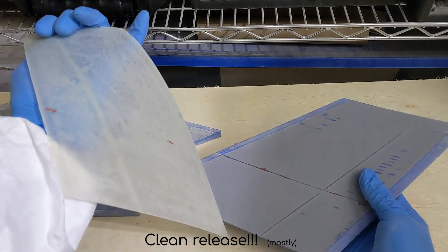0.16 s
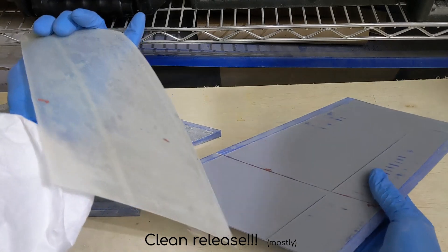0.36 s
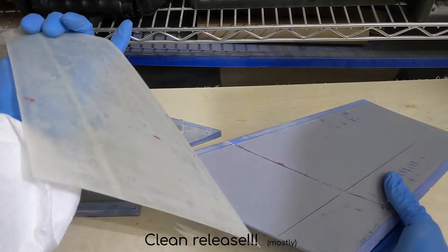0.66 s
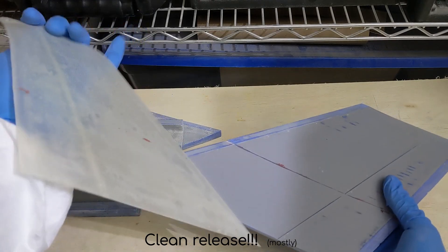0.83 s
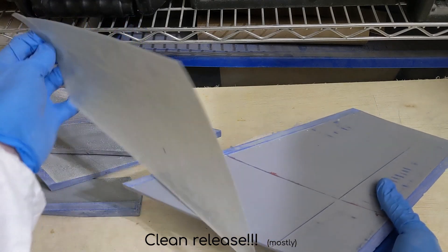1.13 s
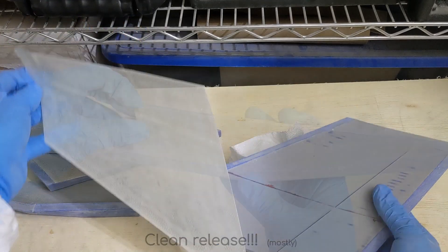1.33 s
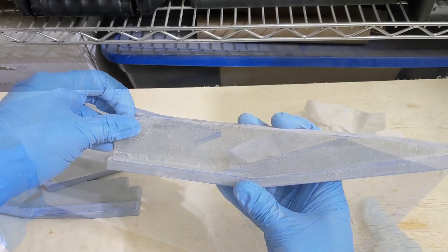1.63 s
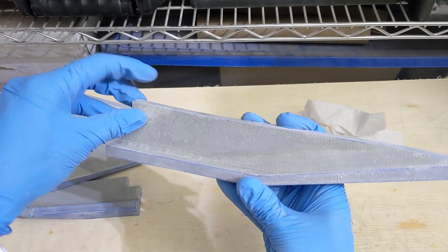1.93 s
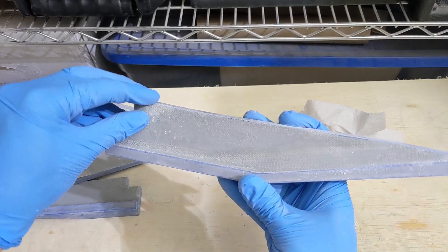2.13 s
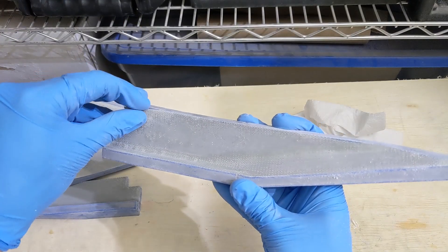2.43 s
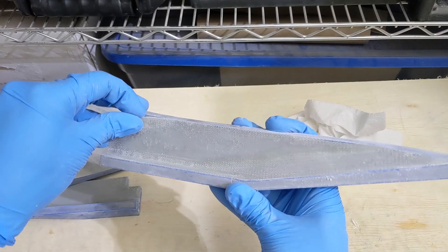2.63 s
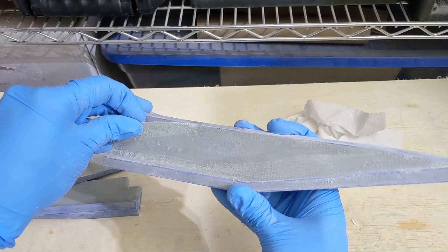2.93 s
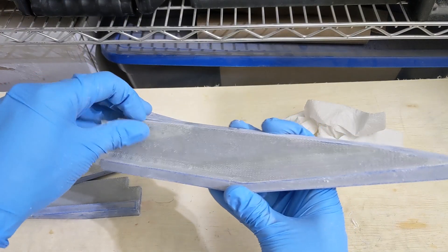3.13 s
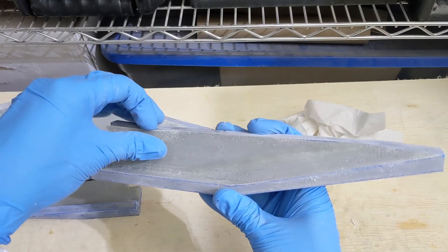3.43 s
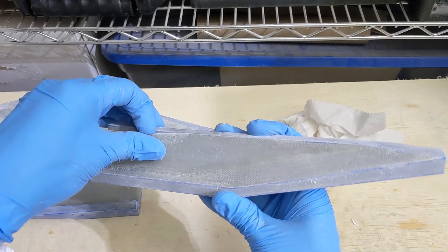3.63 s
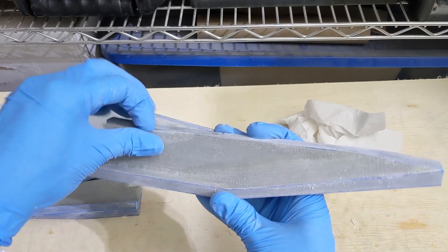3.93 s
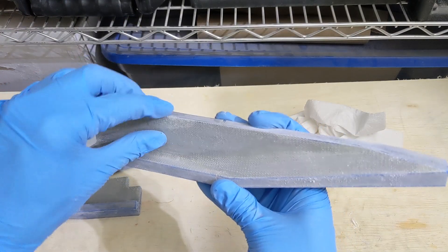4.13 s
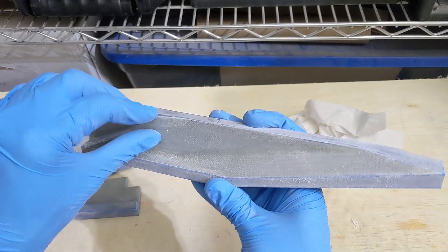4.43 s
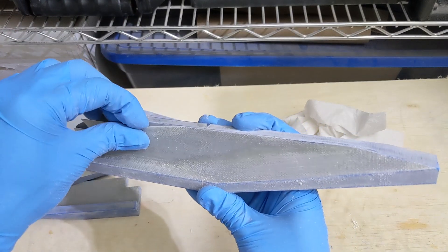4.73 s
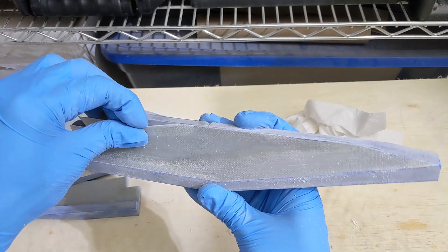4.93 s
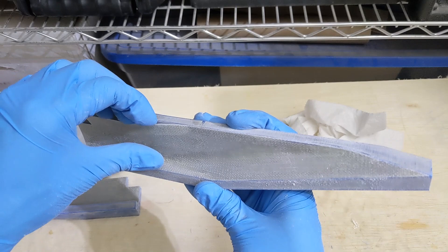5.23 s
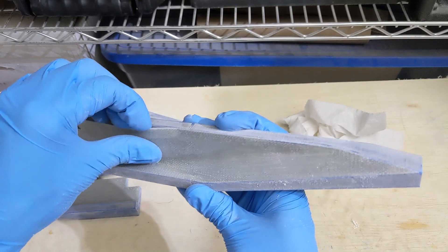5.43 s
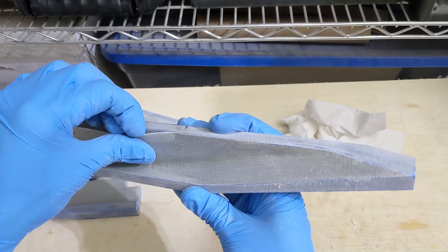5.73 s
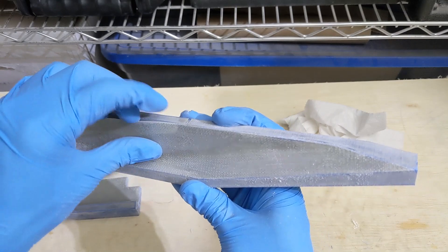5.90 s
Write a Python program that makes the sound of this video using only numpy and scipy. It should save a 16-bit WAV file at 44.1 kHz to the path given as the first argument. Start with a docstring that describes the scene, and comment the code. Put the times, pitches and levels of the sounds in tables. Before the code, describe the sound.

A stiff sheet scrapes and is tapped quietly, then a loud brittle crack with a low thump and two more snaps ring in a small workshop.

```python
"""A thin fiberglass skin is prised off its plastic mold at a workbench and lets go in three sharp snaps.
Each snap is shaped noise with mold resonances and a room tail; the first adds an air pulse and a low thump.
A loose skin scrapes as resonant friction, rubber gloves slide as grainy noise, and resin ticks
and fingers tap as small pitched cracks. The small workshop rings briefly; a ventilation fan hums low,
made of coloured noise and wavering tones."""
import sys
import numpy as np
from scipy import signal
from scipy.fft import rfft, irfft, next_fast_len
from scipy.io import wavfile
from scipy.ndimage import uniform_filter1d

SR = 44100
rng = np.random.default_rng(int(sys.argv[2]) if len(sys.argv) > 2 else 0)


def waveform_to_disk(signal):
    """Save audio, clipped to [-1, 1], as 16-bit WAV at the path in sys.argv[1]."""
    frames = np.transpose(np.atleast_2d(signal))
    scaled = np.clip(frames, -1, 1) * 32767
    samples = np.round(scaled).astype(np.int16)
    wavfile.write(sys.argv[1], SR, samples)


N = 267246
TIME = np.arange(N) / SR
# the background changes between these times; the gloves rub a stiffer body after the second
CHANGE_START_S, CHANGE_END_S = 1.476, 1.58
# the bond lets go: (t/s, direct and room level/dB before the mold rings, crack t60/s,
# room level/dB against the direct crack, room t60/s before the band shares, direct left-right/dB)
SNAPS = [(2.9381, -14, 0.015, -11.5, 0.32, 4.5), (4.8497, -26, 0.012, -10, 0.19, -13.5),
         (5.6378, -14.5, 0.0077, -12.5, 0.35, 9.5)]


def snaps():
    """The skin jumps off the mold; the direct crack leans to one side, the room is even."""
    # colour of each snap: (f/Hz, level/dB)
    snap_colours = [
        [(200, -13), (850, -9.5), (1300, -3), (1900, -6), (2900, -0.5), (3900, 0.5), (4900, -4.5), (6200, -3),
         (7400, -1), (8500, -3.5), (11500, -3.5), (14500, -0.5), (16000, -4.5)],
        [(200, -40), (1200, -33.5), (1600, -29), (2100, -8), (2900, -10.5), (3400, -13), (4100, -4),
         (5000, -9.5), (6300, -12.5), (9000, -14), (13000, -14), (16000, -26)],
        [(200, -42), (900, -18.5), (1400, -15.5), (2000, -11), (2800, -5), (3800, -2), (4800, -0.5), (6200, 2),
         (8000, 1.5), (9500, -2), (11500, -3), (13500, -6), (16000, -5.5)],
    ]
    # narrow resonances of the skin on its mold, rung by every snap: (f/Hz, width/Hz, level/dB)
    mold_modes = [(1350, 330, -4.5), (2920, 120, -3.5), (4050, 100, -6), (6103, 99, 4), (7000, 190, 0.5),
                  (14000, 130, -1), (15300, 93, -7), (14800, 69, 3)]
    out = np.zeros((2, N))
    for (s, db, t60, room_db, room_t60, pan_db), spectrum in zip(SNAPS, snap_colours):
        x = crack(spectrum, db, t60, room_db, room_t60, pan_db, edge_db=-12.5, ring_db=-4.5, ring_t60=0.12)
        ringing = sum(resonate(x, [mode]) for mode in mold_modes)
        add(out, s, x + ringing)
    return out


def puff_and_low_pulse(last_db=-17, last_width_s=0.00017, rumble_cut_hz=40):
    """The first snap shoves air out, mostly at right; a small low pulse sounds with the last, more at left."""
    puff_s, puff_db, puff_width_s = 2.9391, -5.5, 0.00046
    thump_hz, thump_t60_s, thump_db, onset_s = 59.2, 0.056, -6, 0.00066
    puff = from_db(puff_db) * np.exp(-((TIME - puff_s) / puff_width_s) ** 2)
    t = np.maximum(TIME - puff_s, 0)
    swing = -np.cos(2 * np.pi * thump_hz * t) * (1 - np.exp(-t / onset_s))
    thump = from_db(thump_db) * swing * np.exp(-np.log(1000) * t / thump_t60_s)
    last_snap_s = SNAPS[-1][0]
    low_pulse = from_db(last_db) * np.exp(-((TIME - last_snap_s) / last_width_s) ** 2)
    channels = (puff + thump) * from_db([[-24], [0]]) + low_pulse * from_db([[0], [-8]])
    high_pass = signal.butter(4, rumble_cut_hz, "high", fs=SR, output="sos")
    return signal.sosfilt(high_pass, channels + 1e-18)


def fractures():
    """Swelling runs of tiny fractures around the snaps; the first and last run on past the snap."""
    # runs of fractures: (start t/s, end t/s, level/dB at the start, level/dB at the end), before the side lean
    runs = [(2.915, 2.944, -76, -58), (4.809, 4.849, -53, -44.5), (5.588, 5.667, -64, -61)]
    # colour of the fractures: (f/Hz, level/dB)
    fracture_colour = [(500, -21), (1500, -17.5), (2700, -2.5), (5500, -2), (9000, -3.5), (16000, -8.5)]
    level = np.zeros(N)
    for start, end, start_db, end_db in runs:
        swell = from_db(np.interp(TIME, [start, end], [start_db, end_db]))
        level += swell * (TIME >= start) * (TIME < end)
    grains = friction(per_s=1500, grain_db=4.5, smooth_db=-14.0)
    return level * rms_one(colour(grains, fracture_colour)) * from_db([[-1], [1]])


def ticks():
    """The resin ticks as the skin is flexed: clear cracks, and faint ones at random while it is prised."""
    # small cracks of the resin: (t/s, level/dB, centre f/Hz, spread/octaves)
    clear = [(0.243, -57.5, 2030, 0.12), (0.9027, -50.5, 6530, 0.16), (1.11, -62.5, 4360, 0.067),
             (1.7889, -57.5, 3630, 0.46), (2.262, -56, 7550, 0.31), (2.485, -59, 6100, 0.6),
             (2.8312, -60, 3320, 1.2), (3.6774, -61, 3900, 0.6), (3.708, -56.5, 4420, 0.39),
             (3.8494, -59, 4180, 0.16), (3.895, -58, 2780, 0.11), (4.0829, -48.5, 6760, .45),
             (4.797, -51.5, 10500, 0.3), (4.814, -51.5, 11500, .4), (4.826, -43, 3760, 0.45),
             (4.831, -42.5, 5500, 0.77), (5.605, -45.5, 5800, 0.42), (5.8272, -54.5, 11130, 0.16),
             (5.837, -52.5, 7000, 1.1), (5.9287, -50, 6700, .45)]
    prising_start, prising_end = 3.4, TIME[-1]
    faint_per_s, faint_db, faint_hz, faint_octaves = 2.0, -68.5, 6050, 0.8
    prising = prising_end - prising_start
    faint = []
    for when, pitch in rng.random((int(faint_per_s * prising), 2)):
        # pitches fall within half an octave either way
        faint.append((prising_start + when * prising, faint_db, faint_hz * 2 ** (pitch - 0.5), faint_octaves))
    out = np.zeros((2, N))
    for s, db, hz, spread in clear + faint:
        add(out, s, small_hit(db, hz, spread, t60=0.016, ring_t60=0.062, room_db=-6.0, room_t60=0.17,
                              pan_db=-8.5, edge_db=-1.5, treble_db=-20))
    return out


def scrape():
    """The edge of the loose skin sticks and slips, ringing the whole sheet."""
    # the loose skin is pushed over the mold: (peak t/s, slide/s, level/dB)
    scrapes = [(0.0, 0.16, -47.5), (0.465, 0.053, -48)]
    # resonances of the loose skin: (f/Hz, width/Hz, level/dB)
    skin = [(403, 62, -10), (780, 47, -2.5), (1410, 210, -7), (1930, 510, -8.5), (2690, 180, 2.5),
            (3000, 200, 1.5), (3400, 1400, -13)]
    # the sheet radiates less treble: (f/Hz, level/dB)
    scrape_top = [(3200, -5.5), (5500, -12), (9000, -9.5), (15000, -20)]
    # each push takes hold, loses force as it slides, then lifts off
    grip_db_per_s, sag_db_per_s, lift_db_per_s = 195, 111, 450
    force = np.zeros(N)
    for s, slide, db in scrapes:
        t = TIME - s
        grip = grip_db_per_s * np.minimum(t, 0)
        sag = sag_db_per_s * np.clip(t, 0, slide)
        lift = lift_db_per_s * np.clip(t - slide, 0, 1)
        force += from_db(db + grip - sag - lift)
    slips = friction(per_s=600, grain_db=1, smooth_db=5.5)
    return force * rms_one(colour(resonate(slips, skin), scrape_top))


def gloves():
    """Rubber slides over the loose skin, then the molded shell: grainy hiss over the rubbed body's own colour."""
    # glove strokes: (peak t/s, length/s, rubber hiss level/dB, rubbed body level/dB), before the side lean
    strokes = [(0.412, 0.027, -48, -48.5), (0.913, 0.036, -57.5, -51.5), (0.953, 0.033, -71, -53),
               (1.03, 0.083, -75.5, -71), (1.122, 0.033, -71.5, -60), (1.216, 0.064, -68, -61.5),
               (1.336, 0.12, -76.5, -70.5), (1.498, 0.018, -68.5, -66), (1.937, 0.036, -61, -71.5),
               (2.112, 0.075, -76, -73.5), (2.285, 0.041, -58.5, -56.5), (3.122, 0.037, -62, -80),
               (3.208, 0.06, -58, -73), (3.274, 0.096, -66.5, -82), (4.074, 0.12, -62, -66.5),
               (4.308, 0.064, -60.5, -66), (4.436, 0.033, -78.5, -72.5), (5.21, 0.064, -60, -72.5),
               (5.935, 0.049, -56.5, -60.5)]
    # colour of the rubber: (f/Hz, level/dB)
    rubber = [(300, -14.5), (1500, -29), (2300, -10), (3500, 3.5), (5500, 2), (8000, -1), (12000, -1),
              (13500, -14), (16000, -12.5)]
    # the loose skin when rubbed: (f/Hz, level/dB)
    sheet = [(150, -22), (320, -3), (550, -2.5), (1150, -3.5), (2300, 0), (3500, -4), (7500, -13),
             (10000, -23.5), (15000, -30.5)]
    # resonances of the shell held in the hand: (f/Hz, width/Hz, level/dB)
    shell = [(1263, 108, -0.5), (1954, 340, -2.5), (3160, 890, -6.5)]
    # between strokes the grip creeps a little all the time
    creep_hiss_db, creep_body_db, creep_swing_db, creep_per_s = -83.5, -83.5, 4, 6
    creep = from_db(creep_swing_db * drift(creep_per_s))
    hiss, body = from_db(creep_hiss_db) * creep, from_db(creep_body_db) * creep
    rise_share = 0.38  # part of a stroke spent speeding up
    for s, length, hiss_db, body_db in strokes:
        width = length * np.where(TIME < s, rise_share, 1 - rise_share)
        stroke = 1 / np.cosh(np.clip((TIME - s) / width * 1.16, -20, 20))
        hiss += from_db(hiss_db) * stroke
        body += from_db(body_db) * stroke
    slips = friction(per_s=1500, grain_db=3.5, smooth_db=-6)
    loose_skin = rms_one(colour(slips, sheet))
    molded_shell = rms_one(resonate(slips, shell))
    rubbed = np.where(TIME < CHANGE_END_S, loose_skin, molded_shell)
    return (hiss * rms_one(colour(slips, rubber)) + body * rubbed) * from_db([[-1], [1]])


def taps():
    """Fingers and edges knock dully on the thin laminate; a soft touch rings one narrow band."""
    # knocks: (t/s, level/dB, centre f/Hz, spread/octaves)
    knocks = [(0.027, -51.5, 3000, 0.16), (0.1185, -46.5, 1413, 0.12), (0.2264, -53.5, 510, 0.26),
              (0.227, -60, 1730, .18), (0.397, -44.5, 2220, 0.67), (0.417, -44.5, 2030, 0.24),
              (0.764, -63.5, 1500, 0.28), (0.919, -48.5, 1180, 0.28), (1.213, -53, 770, 0.68),
              (3.8956, -48.5, 1630, 0.54), (4.0824, -54, 1310, .13), (5.882, -58.5, 1360, 0.12)]
    out = np.zeros((2, N))
    for s, db, hz, spread in knocks:
        add(out, s, small_hit(db, hz, spread, t60=0.018, ring_t60=0.038, room_db=-7, room_t60=0.14,
                              pan_db=-2, edge_db=-6.5, treble_db=-49))
    return out


def small_hit(db, hz, spread, t60, ring_t60, room_db, room_t60, pan_db, edge_db, treble_db,
              bass_db=-54, dryness=0.28):
    """A small crack ringing round its own pitch over weaker treble and bass; the higher, the sooner it dies."""
    octaves = np.linspace(-6, 6, 241)
    floor_db = np.where(octaves < 0, bass_db, treble_db)
    bell_db = floor_db * octaves ** 2 / (octaves ** 2 + 11 * spread ** 2)
    spectrum = np.column_stack([hz * 2 ** octaves, bell_db])
    length = (3000 / hz) ** dryness  # both decay times hold as given at 3 kHz
    return crack(spectrum, db, t60 * length, room_db, room_t60, pan_db, edge_db,
                 ring_db=2.5, ring_t60=ring_t60 * length)


def crack(spectrum, db, t60, room_db, room_t60, pan_db, edge_db, ring_db, ring_t60):
    """Sharp edge, burst of resin, the shell's short ring and the room; db is the energy spread over 10 ms."""
    burst = dying_noise(t60)
    burst[:, 0] += from_db(edge_db)
    direct = even(burst) * from_db([[pan_db / 2], [-pan_db / 2]])
    direct = direct + from_db(ring_db) * dying_noise(ring_t60)
    direct = direct / np.sqrt(np.sum(direct ** 2) / 2)
    x = colour(direct + from_db(room_db) * room_tail(room_t60), spectrum)
    return from_db(db) * x / np.sqrt(np.sum(x ** 2) / 2 / (SR / 100))


def even(burst, smooth_hz=400):
    """Level out the chance humps in a burst's spectrum, so that a crack keeps its own colour."""
    size = burst.shape[1]
    bins = max(int(smooth_hz * size / SR), 1)
    power = uniform_filter1d(np.abs(rfft(burst)) ** 2, bins, axis=1)
    hz = np.fft.rfftfreq(size, 1 / SR) + 1
    sides = []
    for side, p in zip(burst, power):
        inverse_db = -10 * np.log10(p / p.mean())
        sides.append(colour(side, np.column_stack([hz, inverse_db])))
    return np.array(sides)


def dying_noise(t60):
    """Half a second of dense ringing, different in each channel, with unit energy per side."""
    t = TIME[:SR // 2]
    x = rng.standard_normal((2, len(t))) * np.exp(-np.log(1000) * t / t60)
    return x / np.sqrt(np.sum(x ** 2, axis=1, keepdims=True))


def friction(per_s, grain_db, smooth_db):
    """Tiny slips of uneven size, each blurred by the room, over a smooth hiss."""
    when = rng.random(N) < per_s / SR
    size = from_db(grain_db * np.minimum(rng.exponential(1, N), 4))
    slips = when * size * rng.choice([-1, 1], N)
    blur = dying_noise(0.0051) + from_db(-3.5) * dying_noise(0.33)
    grains = rms_one(signal.fftconvolve(slips[None], blur, axes=1)[:, :N])
    return grains + from_db(smooth_db) * rng.standard_normal((2, N))


def room_tail(t60):
    """Diffuse echoes of the workshop, each band dying at its own rate."""
    # decay by band: (f/Hz, share of the room's t60)
    room_decay = [(500, 0.77), (1300, 0.66), (3000, 1.15), (7000, 1.0), (11000, 0.92), (15000, .56)]
    size = SR // 2
    noise, out = rfft(rng.standard_normal((2, size))), 0
    centres, shares = np.transpose(room_decay)
    for weights, share in zip(np.eye(len(centres)), shares):
        band = irfft(noise * at_hz(np.column_stack([centres, weights]), size), size)
        out = out + band * np.exp(-np.log(1000) * TIME[:size] / (t60 * share))
    return out / np.sqrt(np.sum(out ** 2) / 2)


def workshop():
    """Fan tones and room air; one set cross-fades quickly into another with its own tones and colour."""
    # fan tones before and after: (f/Hz, level/dB before the tone trim)
    hum_early = [(64.6, -75), (113.0, -73), (177.6, -70)]
    hum_late = [(53.8, -70.5), (118.4, -69.5), (161.5, -74.5), (339.1, -82.5)]
    # colour of the workshop air before and after: (f/Hz, level/dB)
    air_early = [(20, -45), (45, -4), (70, -7), (160, 0.5), (260, -12.5), (500, -15), (1000, -21.5),
                 (3000, -28), (8000, -33), (13000, -42), (16200, -63)]
    air_late = [(20, -30.5), (39, -15.5), (52, -2), (85, 0), (150, 3), (250, -10.5), (500, -21),
                (1000, -24.5), (3000, -29), (7000, -30.5), (11000, -38), (15000, -41), (16200, -52)]
    late = np.interp(TIME, [CHANGE_START_S, CHANGE_END_S], [0, 1])
    before = air(air_early, -66, hum_early, tone_db=2.0)
    after = air(air_late, -61, hum_late, tone_db=-1.0)
    return np.sqrt(1 - late) * before + np.sqrt(late) * after


def air(spectrum, db, tones, tone_db):
    """Fan rumble, more alike in both channels in the bass, with tones wavering in level and phase."""
    # left-right likeness: (f/Hz, correlation)
    likeness = [(60, .94), (130, .8), (290, 0.6), (640, 0.64), (1400, 0.24), (3000, .01)]
    size = next_fast_len(N, real=True)
    alike = np.clip(at_hz(likeness, size), 0, 1)
    mid, side = rfft(rng.standard_normal((2, size))) * from_db(at_hz(spectrum, size))
    stereo = np.sqrt(1 + alike) * mid + np.sqrt(1 - alike) * side * [[1], [-1]]
    noise = irfft(stereo, size)[:, :N]
    hum = 0
    for hz, level in tones:
        swell = from_db(level + tone_db + drift(6.5))
        phase = 2 * np.pi * hz * TIME + 0.83 * drift(9.6)
        hum = hum + swell * np.sqrt(2) * np.sin(phase)
    return from_db(db) * rms_one(noise) + hum


def from_db(db):
    """Decibels to gain."""
    return 10 ** (np.asarray(db) / 20)


def rms_one(x):
    """Scale to unit rms."""
    return x / np.sqrt(np.mean(x ** 2) + 1e-20)


def at_hz(points, size):
    """A table read on the bins of an FFT, straight on a log-frequency axis."""
    hz, value = np.transpose(points)
    return np.interp(np.log(np.fft.rfftfreq(size, 1 / SR) + 1), np.log(hz), value)


def colour(x, spectrum):
    """Causal (minimum-phase) filter with the given (f/Hz, level/dB) shape."""
    size = 2 * next_fast_len(x.shape[-1] // 2 + 2048)
    cepstrum = irfft(np.log(from_db(at_hz(spectrum, size))))
    # fold the cepstrum forward in time
    cepstrum[1:size // 2] *= 2
    cepstrum[size // 2 + 1:] = 0
    return irfft(rfft(x, size) * np.exp(rfft(cepstrum)))[..., :x.shape[-1]]


def resonate(x, modes):
    """Parallel two-pole resonances (f/Hz, width/Hz, level/dB) with alternating signs."""
    out = 0
    for k, (hz, width, db) in enumerate(modes):
        r = np.exp(-np.pi * width / SR)
        zeros = np.array([1, 0, -1]) * (1 - r * r) / 2
        poles = [1, -2 * r * np.cos(2 * np.pi * hz / SR), r * r]
        out = out + (-1) ** k * from_db(db) * signal.lfilter(zeros, poles, x)
    return out


def drift(rate):
    """Slow chance: straight lines between unit-spread random points, rate points per second."""
    return np.interp(TIME * rate, np.arange(4096), rng.standard_normal(4096))


def add(out, s, sound):
    """Mix a short sound in at time s."""
    at = int(round(s * SR))
    out[:, at:at + sound.shape[1]] += sound[:, :N - at]


def scene():
    """All sources at the bench."""
    skin_and_mold = snaps() + puff_and_low_pulse() + fractures() + ticks()
    hands = scrape() + gloves() + taps()
    return skin_and_mold + hands + workshop()


def record(dry):
    """The hardest cracks overload; the top is cut."""
    clipped = np.clip(dry, -1, 1)
    low_pass = signal.ellip(10, 0.1, 90, 16200, fs=SR, output="sos")  # order, ripple/dB, stop/dB, f/Hz
    return signal.sosfilt(low_pass, clipped)


dry = scene()
out = record(dry)
waveform_to_disk(out)
```